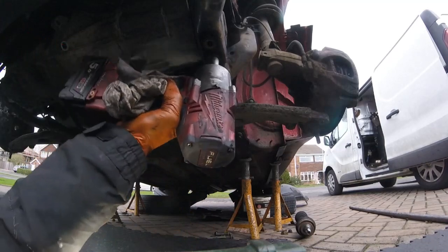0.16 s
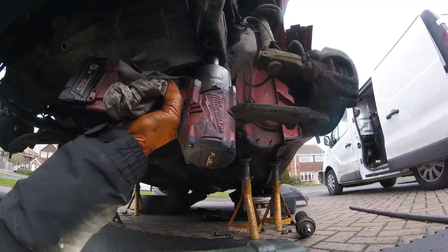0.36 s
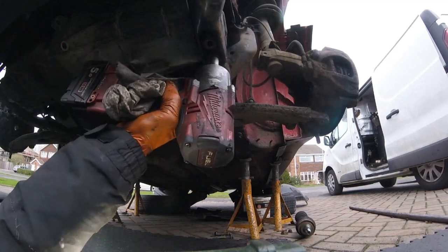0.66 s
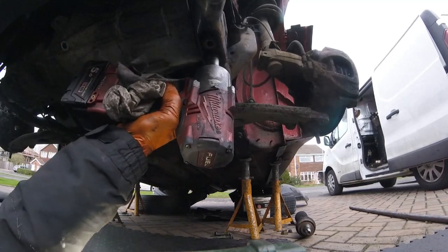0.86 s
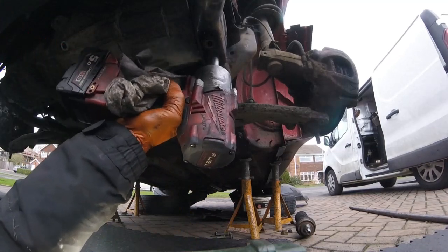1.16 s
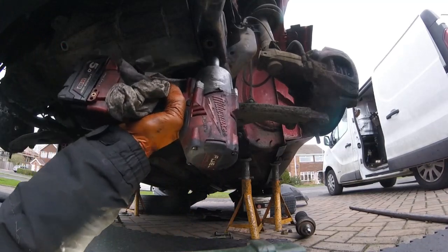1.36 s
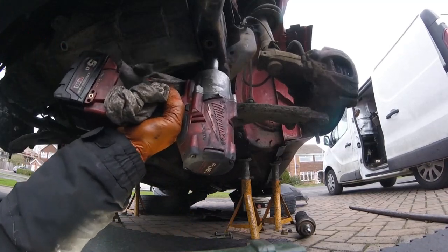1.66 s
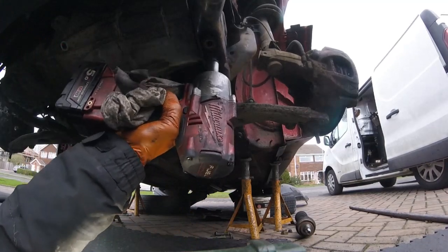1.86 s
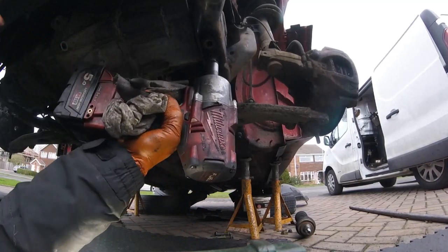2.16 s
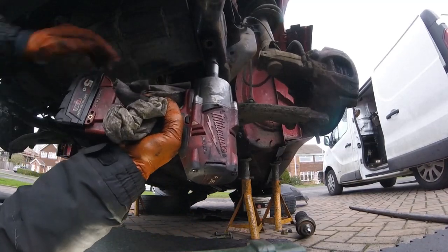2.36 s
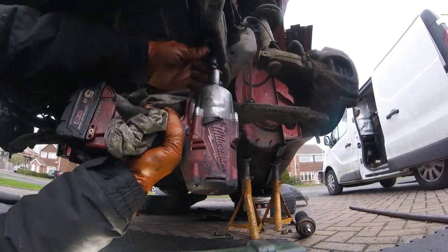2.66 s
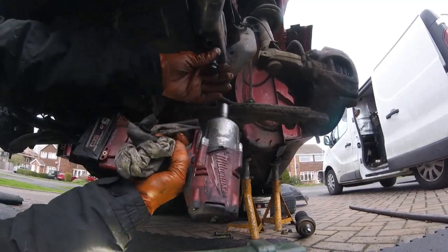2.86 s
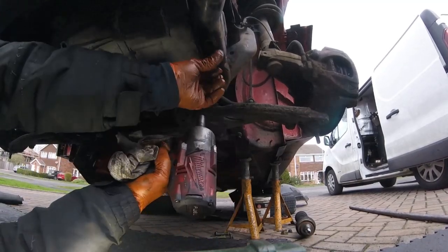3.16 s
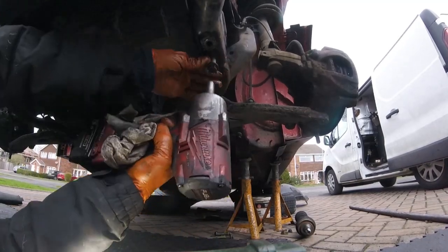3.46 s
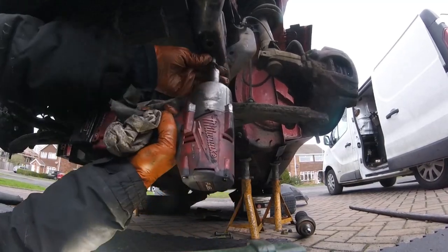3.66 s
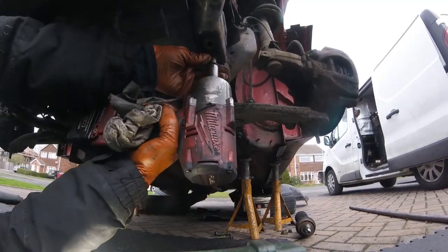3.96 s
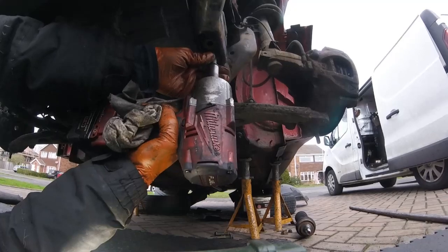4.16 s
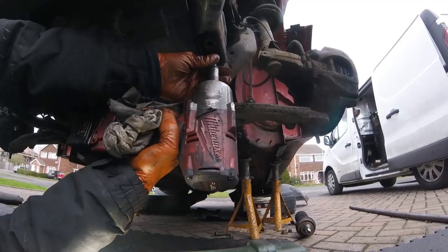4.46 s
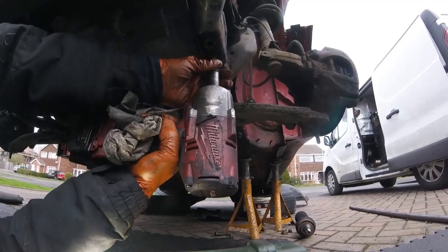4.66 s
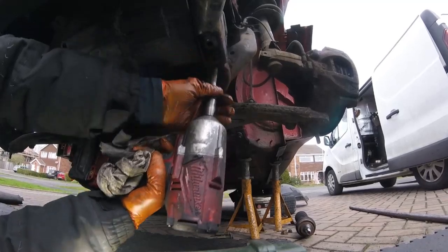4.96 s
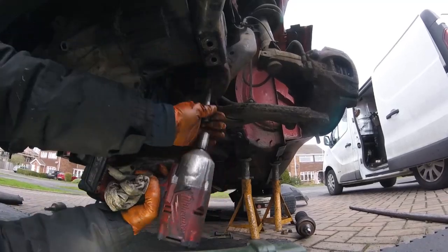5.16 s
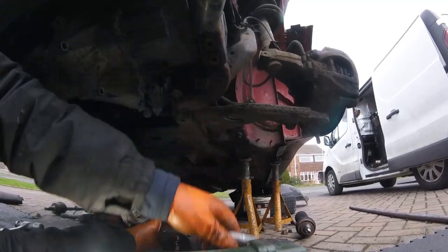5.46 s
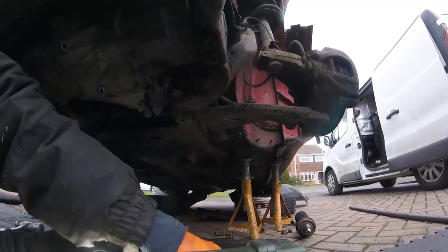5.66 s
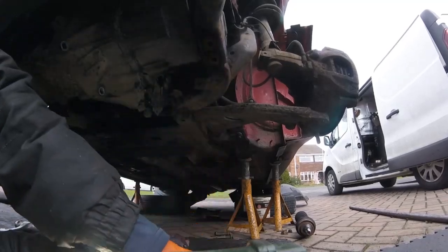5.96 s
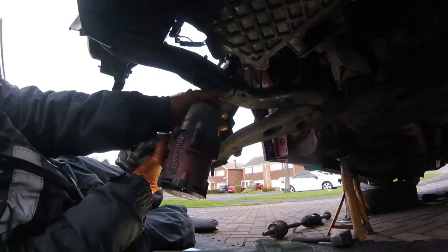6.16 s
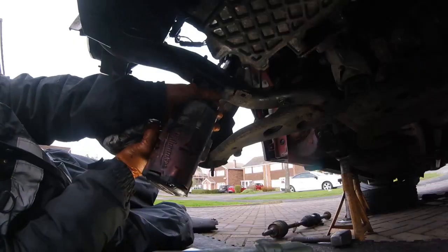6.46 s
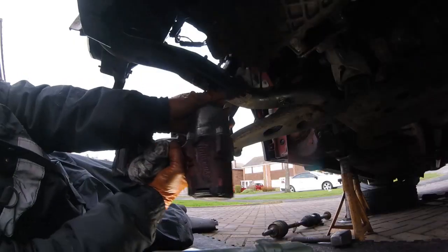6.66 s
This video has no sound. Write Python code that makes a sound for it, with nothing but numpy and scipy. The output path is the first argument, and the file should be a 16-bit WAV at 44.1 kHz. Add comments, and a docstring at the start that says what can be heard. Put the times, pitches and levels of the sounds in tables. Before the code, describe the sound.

Gusty wind buffets a muffled microphone while a cordless impact wrench rattles harshly on steel, stops, clicks, and later whirs freely without hammering.

```python
"""A cordless impact wrench under a car on a windy drive: a train of blows rings steel modes by modal synthesis.
Its motor is shaped gear noise plus sines: a chopper whine with sidebands, and orders of the turning field.
It hammers a bolt, brakes to a stop, spins free at part throttle, then after a short blip spins free again.
Parts click, squeaks and rustle lie over gusty wind: modulated rumble and flutter with separate pressure pops.
A closed housing dulls the sound at the microphone, and everything falls silent briefly near 6.2 s."""
import sys
import numpy as np
from scipy import signal
from scipy.fft import rfft, irfft, next_fast_len
from scipy.io import wavfile
from scipy.ndimage import uniform_filter1d

SR = 44100
rng = np.random.default_rng(int(sys.argv[2]) if len(sys.argv) > 2 else 0)


def master(y):
    """Save y as 16-bit WAV."""
    cut = np.clip(np.atleast_2d(y).T, -1, 1)
    pcm = np.round(cut * 32767)  # scale
    wavfile.write(sys.argv[1], SR, pcm.astype(np.int16))


N = 300188


def amp(db):
    """Level law: decibels to amplitude gain."""
    return 10 ** (np.asarray(db) / 20)


def evened(x):
    """Normalization: scales a signal to unit rms."""
    return x / np.sqrt(np.mean(x ** 2) + 1e-20)


def colour(x, points):
    """Linear filtering: multiplies the spectrum by a (f/Hz, gain/dB) curve."""
    f, db = np.transpose(points)
    size = next_fast_len(len(x))
    hz = np.fft.rfftfreq(size, 1 / SR)
    gain = amp(np.interp(np.log(hz + 1), np.log(f + 1), db))
    return irfft(rfft(x, size) * gain, size)[:len(x)]


def noise(points, count=N):
    """Stationary random noise of unit rms with a given spectral density."""
    return evened(colour(rng.standard_normal(count), points))


def drift(hz, count=N):
    """Slow random modulation: unit noise with little power above hz."""
    return noise([(hz / 20, 0), (hz, 0), (2 * hz, -40)], count=count)


def add(mix, s, sound):
    """Superposition: adds a sound to the mix at time s."""
    part = mix[max(round(s * SR), 0):][:len(sound)]
    part += sound[:len(part)]


def spread(rows):
    """Linear interpolation: start time and per-sample columns of a time table."""
    s, *columns = np.transpose(rows)
    times = np.arange(s[0], s[-1], 1 / SR)
    return s[0], [np.interp(times, s, c) for c in columns]


def level(tables):
    """Amplitude envelope of (t/s, level/dB) tables, silent outside them."""
    gain = np.zeros(N)
    for rows in tables:
        s, (db,) = spread(rows)
        add(gain, s, amp(db))
    return uniform_filter1d(gain, int(0.0027 * SR))  # edges smoothed over 2.7 ms


def tone(hz, waver_db):
    """Frequency modulation: a sine of integrated pitch whose strength wavers at random."""
    phase = 2 * np.pi * (np.cumsum(hz) / SR + rng.random())
    return np.sqrt(2) * amp(waver_db * drift(27, count=len(hz))) * np.sin(phase)


# Ringing modes of the struck anvil [f/Hz, nominal level/dB, nominal t60/s]
ANVIL_MODES = [(608, -15.5, 0.11), (735, -14, 0.092), (805, -10.5, 0.065), (961, -10.5, .09),
               (1181, -8, 0.075), (1557, -6.5, 0.069), (1930, -16.5, 0.11), (2150, -13, 0.089),
               (2822, -11.5, 0.069), (3580, -12, .06), (3870, -9, 0.05), (4350, -17, .06),
               (4900, -8, 0.044), (5110, 1.5, 0.027), (5380, -2.5, 0.047), (5680, -2.5, 0.05),
               (6440, -5.5, .04), (6460, -2, 0.042), (6590, -4, 0.055), (7100, -6, 0.036),
               (7600, -5.5, 0.029)]
# Noise spectrum of metal contact, also used by chatter [f/Hz, relative density/dB]
CRASH_SPECTRUM = [(240, -51.5), (400, -25), (510, -32), (584, -9.5), (649, -10), (791, -12.5), (1070, -3),
                  (1520, -2), (1710, -4), (2210, 0.5), (4120, -2.5), (5170, 2.5), (7320, -8), (9050, -9.5),
                  (14900, -44)]
CONTACT_S, SNAP_T60_S = .00025, .011  # linear rise at contact; decay of the bright snap


def strike(low_db, top_db, bolt_db, t60, bounce_s, bounce_db, ring_db, tail_db, share=1):
    """Impact excitation: snap, noise crash, rebound, decaying modes and a tail off the underbody."""
    t = np.arange(int(.15 * SR)) / SR - .005  # starts 5 ms before contact
    late = t - bounce_s
    shape = amp(-60 * t / t60)
    shape = shape + amp(bounce_db - 60 * late / t60) * (late > 0)
    shape = shape + amp(tail_db - 60 * t / 0.095)
    snap = noise([(4000, -28.0), (6500, 6.0), (8000, -2.5), (10000, -6.5), (12000, -20.5),
                  (15000, -33.5)], count=len(t))
    crash = noise(CRASH_SPECTRUM, count=len(t)) * shape
    crash = crash + amp(top_db + 3.5 - 60 * t / SNAP_T60_S) * snap
    ring = np.zeros(len(t))
    for hz, db, long in ANVIL_MODES:
        louder, sharper, phase = rng.standard_normal(3)  # each strike excites the modes differently
        decay = amp(db + 4.2 * louder - 60 * t / (long * share))
        ring += decay * np.sin(2 * np.pi * hz * (1 + 0.008 * sharper) * t + np.pi * phase)
    # the rebound rings too
    ring = ring + amp(bounce_db) * np.roll(ring, round(bounce_s * SR)) * (late > 0)
    tilt = [(300, low_db), (2300, low_db), (4400, 0.003), (5900, 0.00064), (6450, bolt_db),
            (6950, 0.00062), (7400, 2.8 * top_db)]
    hit = colour((crash + amp(ring_db) * ring) * np.clip(t / CONTACT_S, 0, 1), tilt)
    return hit / np.sqrt(np.mean(hit[(t > 0) & (t < .005)] ** 2))  # unit rms over the first 5 ms


# Hammer on anvil; level is taken over the first 5 ms
# [t/s, level/dB, low knock gain/dB, bolt ring gain/dB, rebound delay/ms, rebound level/dB, t60/s]
HAMMER_BLOWS = [(0.988, -13, -4, 1.5, 5.8, -2.5, 0.033), (1.058, -16, 0, -1, 5.7, -6.5, 0.033),
                (1.0943, -14, 0.5, 0, 4, -1, 0.044), (1.1202, -11.5, 0, 5.5, 2.9, -3.5, 0.049),
                (1.1483, -11.5, 1, 6.5, 2.15, -5.5, 0.029), (1.175, -13.5, 0, 4, 3.6, -7, 0.047),
                (1.2002, -17.5, -14, 9, 3.6, 0.5, 0.11), (1.2288, -14, -3.5, -1, 2.5, -10, 0.036),
                (1.2562, -15, -0.5, -2.5, 3.7, -4, .045), (1.286, -16.5, 1.5, -1, 4.5, -5, 0.047),
                (1.314, -16, 2, -7, 2.9, -3, 0.047), (1.345, -16, 1.5, 1, 3.1, -7.5, 0.045),
                (1.378, -16, 1.5, -6, 4.2, -19, 0.035), (1.42, -15, 2, 4.5, 4.2, -16, 0.021),
                (1.4611, -14, 3, 5.5, 6, -13.5, 0.037), (1.505, -13.5, -0.5, 3, 3.8, -5, 0.039),
                (1.5467, -14, 0, 1, 1.8, -10.5, 0.052), (1.5908, -15, -5.5, 0.5, 5.8, -18, 0.077),
                (1.635, -16.5, -3.5, -4, 5.9, -7, 0.047), (1.677, -19, -4, -2, 3.5, -13, 0.053),
                (1.7202, -17, -3.5, -5, 3, -16, 0.063), (1.7636, -16.5, -3.5, -13, 3.05, -10.5, 0.035)]
BLOW_TOP_DB, UNEVEN_TOP_DB = 2.0, .7  # mean and random spread of the top-end weight


def hammer():
    """Repeated impact: the hammer drives the anvil and bolt in a train of blows."""
    out = np.zeros(N)
    for s, db, low_db, bolt_db, ms, bounce_db, t60 in HAMMER_BLOWS:
        top_db = BLOW_TOP_DB + UNEVEN_TOP_DB * rng.standard_normal()
        blow = strike(low_db, top_db, bolt_db, t60, ms / 1e3, bounce_db, ring_db=-4.0, tail_db=-24.0)
        add(out, s - .005, amp(db) * blow)
    return out


# Trigger, socket and slack in the drive; level is taken over the first 5 ms
# [t/s, level/dB, low knock gain/dB, top-end weight/dB]
DRIVE_CLICKS = [(0.157, -46.5, 6, 1.5), (0.414, -46.5, 0, -27), (.852, -51, 21, -20),
                (0.8666, -34, 17.5, -30), (0.935, -24.5, 3.5, -3), (0.976, -36, 1.5, 3),
                (1.0347, -36, 17, -0.5), (1.0845, -20, -1.5, -0.5), (1.784, -28, -9, -2),
                (1.814, -37, -22, 0), (1.832, -33, -23, -2), (1.9607, -35, -3, -2), (2.1065, -29, -8, -2.5),
                (2.164, -37.5, 3, -0.5), (2.258, -34, 9, -1), (2.865, -33.5, 8, -10),
                (2.8879, -25, -1.5, -2), (2.945, -25, -0.5, -3.5), (3.3253, -57, 20, -15),
                (3.441, -46, -15, -2.5), (3.473, -46, -21, -1.5), (3.6453, -39, 8, -14),
                (3.6687, -32, 16, -13), (3.7546, -43.5, 7, 0), (3.824, -47, 7, -15),
                (3.9098, -42.5, 19, -10.5), (3.9781, -22.5, -10.5, -4), (4.042, -44, 11, 15),
                (4.055, -16.5, 1.5, 2), (4.9693, -20.5, -1.5, -9.5), (5.034, -34.5, 1, -3),
                (5.107, -50, 24, -15), (5.1542, -60, 16, -14), (5.251, -46, 6, -5),
                (5.657, -42.5, 25, -20.5), (5.7904, -39.5, 28, -6), (5.8757, -34.5, 24, -16),
                (6.0294, -49, 6, -11), (6.36, -47.5, 13.5, -25)]


def clicks():
    """Light impact: small parts excite the same modes, which die twice as fast as under the hammer."""
    out = np.zeros(N)
    for s, db, low_db, top_db in DRIVE_CLICKS:
        click = strike(low_db, top_db, bolt_db=-7.0, t60=.016, bounce_s=0.0026, bounce_db=-26.5,
                       ring_db=-10.5, tail_db=-11.0, share=.5)
        add(out, s - .005, amp(db) * click)
    return out


# Gear noise of each trigger pull, also driving chatter [t/s, level/dB]
GEAR_LEVELS = [
    [(.925, -38.5), (.979, -29.5), (1.012, -29.5), (1.02, -39), (1.17, -26), (1.35, -34.5), (1.79, -35.5),
     (1.93, -37.5), (2.04, -44), (2.065, -53)],
    [(2.11, -36.5), (2.14, -41), (2.2, -45.5), (2.5, -44.5), (2.75, -42), (2.87, -40.5), (2.93, -58)],
    [(3.964, -42), (4.04, -38), (4.1, -36.5), (4.4, -33), (4.85, -31), (4.97, -26), (5.0, -41),
     (5.05, -44.5)],
]
# Gear noise spectrum [f/Hz, relative density/dB]
GEAR_SPECTRUM = [(240, -32), (400, -2.5), (554, -3), (863, 2.5), (1280, -2.5), (1530, 1), (1790, -1),
                 (2120, 0), (3760, -5), (5560, 1.5), (7310, -7.5), (8000, -8.5), (9000, -13.5),
                 (11700, -48.5), (19800, -120)]
# Fan hiss spectrum [f/Hz, relative density/dB]
FAN_SPECTRUM = [(7000, -33.5), (8500, -14), (10000, 4), (11800, -9), (13000, -13), (14500, -32.5)]
# Fan hiss relative to the gears, one value a pull [level/dB]
FAN_LEVELS = -24, -20, -17
# The housing sings as the motor bites [t/s, level/dB]
SING_LEVELS = [(3.982, -46), (4.04, -50), (4.08, -49), (4.125, -43), (4.16, -56)]
SING_HZ = 2940


def gear_noise():
    """Broadband machine noise: gears and fan under random modulation, with a narrow singing band."""
    fan = sum(amp(db) * level([rows]) for rows, db in zip(GEAR_LEVELS, FAN_LEVELS))
    whir = level(GEAR_LEVELS) * noise(GEAR_SPECTRUM) + fan * noise(FAN_SPECTRUM)
    roughness = evened(amp(1.8 * drift(36) + 2.0 * drift(330)))
    band = [(SING_HZ - 150, -30), (SING_HZ - 30, 0), (SING_HZ + 30, 0), (SING_HZ + 150, -30)]
    return whir * roughness + level([SING_LEVELS]) * noise(band)


# Part throttle: the first whine under the chopper follows the rotor [t/s, whine f/Hz, reference level/dB]
SPIN_CURVES = [
    [(2.16, 7370, -57), (2.22, 7340, -53), (2.27, 7323, -52), (2.38, 7305, -51), (2.45, 7298, -49),
     (2.55, 7293, -49), (2.65, 7289, -49), (2.76, 7285, -47), (2.81, 7264, -45), (2.86, 7240, -46)],
    [(4.075, 7420, -44), (4.11, 7365, -39), (4.14, 7350, -38), (4.2, 7320, -38), (4.29, 7286, -39.5),
     (4.41, 7251, -39), (4.53, 7224, -38), (4.65, 7207, -38.5), (4.8, 7194, -38), (4.94, 7184, -38)],
]
# A short blip just before the second spin [t/s, whine f/Hz, reference level/dB]
BLIP_CURVE = [(3.99, 7600, -50), (4.02, 7490, -48), (4.05, 7455, -47)]
# Sideband offsets from the chopper [multiple of the field frequency]
SIDEBAND_ORDERS = -5, -4, -3, -2, -1, 0, 1, 2, 3, 4
# Sideband strengths at a field of 532.5 Hz [level relative to the reference/dB]
SIDEBAND_LEVELS = -3, -1, -13, -4.5, 0.5, -8, -9, -16.5, -19, -16
# Rotor orders while spinning [multiple of the field frequency]
ROTOR_ORDERS = 2, 2.25, 3, 3.25, 3.44, 4, 4.62, 5, 5.5, 5.7, 6, 6.5, 7, 7.84, 8, 10, 12
# Strength of each order
# [level relative to the reference at 500 Hz field/dB, growth/dB per 100 Hz, extra on a light pull/dB]
ROTOR_ORDER_LEVELS = [(-14, 0, 0), (-24, 0, 12), (-5, 6, -4), (-4, 1, -1), (-16, 0, -3), (-15, 3, 0),
                      (-19, 0, 9), (-13, 5, 0), (-10, 9, -5), (-20, 0, 12), (-13, 1, 8), (-14, 4, -3),
                      (-17, -3, 6), (-24, 0, 10), (-18, -2, 11), (-21, 0, 6), (-23, 0, 11)]
CHOPPER_HZ = 7732
FAR_SIDE_DB_PER_HZ = .022  # growth with speed for each step beyond the first sideband, up to three
SPIN_EDGE_S = 0.0098  # linear fade at switching on and off
FULL_PULL_DB, LIGHT_PULL_DB = -43.5, -48  # reference levels of a firm and of a light pull
HUNTING = .001  # rms tremble of the rotor orders, as a share of speed


def spinning():
    """Modulation sidebands: the field flanks the chopper tone; rotor orders are multiples of the field."""
    whine, orders = np.zeros((2, N))
    for rows in list(SPIN_CURVES) + [BLIP_CURVE]:
        s, (whine_hz, db) = spread(rows)
        t = np.arange(len(db)) / SR
        field = CHOPPER_HZ - uniform_filter1d(whine_hz, size=1500, mode="nearest")
        gain = amp(db) * np.clip(np.minimum(t, t[::-1]) / SPIN_EDGE_S, 0, 1)
        for k, side_db in zip(SIDEBAND_ORDERS, SIDEBAND_LEVELS):
            steps = min(max(abs(k) - 1, 0), 3)
            speed_db = steps * FAR_SIDE_DB_PER_HZ * (field - 532.5)
            sideband = tone(CHOPPER_HZ + k * field, waver_db=0.34 * abs(k))
            add(whine, s, gain * amp(side_db + speed_db) * sideband)
        light = np.interp(db, [LIGHT_PULL_DB, FULL_PULL_DB], [1, 0])
        gain = gain * amp(.1 * np.minimum(field - 340, 0))  # faint until the rotor is up to speed
        field = field * (1 + HUNTING * drift(40, count=len(db)))
        for k, (order_db, growth, light_db) in zip(ROTOR_ORDERS, ROTOR_ORDER_LEVELS):
            strength = amp(order_db + growth * (field - 500) / 100 + light_db * light)
            add(orders, s, gain * strength * tone(k * field, waver_db=2.0))
    return whine, orders


# Braking to a stop [t/s, field f/Hz, reference level/dB]
BRAKE_CURVE = [(1.83, 672, -52), (1.87, 680, -48), (1.895, 682, -47), (1.915, 650, -44), (1.945, 576, -48),
               (1.98, 478, -46), (2.015, 375, -48), (2.03, 322, -49), (2.06, 200, -51)]
# Whines under braking [multiple of the field frequency]
BRAKE_ORDERS = 2, 3.67, 4.25, 6, 6.4, 7.4, 8.3, 9.25, 12, 14.6
# Strength of each order at 650 Hz field [level relative to the reference/dB]
BRAKE_ORDER_LEVELS = 3, 3, -5, 0, -2, -1, -2, -1, 1.5, -5
# Change with field frequency; positive slopes fade as it slows [slope/dB per Hz]
BRAKE_ORDER_FADES = -.01, .03, .03, -.005, .04, .03, .03, -.008, .012, .01
# Braking whines carry best in the middle [f/Hz, gain/dB]
BRAKE_RESPONSE = [(900, -9), (2200, -1), (6500, -2), (8500, -9)]


def braking():
    """Order tracking: whines tied to the slowing field glide down together; returns start and sound."""
    s, (field, db) = spread(BRAKE_CURVE)
    field = uniform_filter1d(field, size=500, mode="nearest")
    field = field * (1 + .0045 * drift(130, count=len(db)))  # the brake chatters
    whines = np.zeros(len(db))
    for k, order_db, fade in zip(BRAKE_ORDERS, BRAKE_ORDER_LEVELS, BRAKE_ORDER_FADES):
        whines += amp(db + order_db + fade * (field - 650)) * tone(k * field, waver_db=3.0)
    return s, colour(whines * signal.windows.tukey(len(db), .2), BRAKE_RESPONSE)


# Tool housing resonances [f/Hz, width/Hz, peak gain/dB for noise]
SHELL_RESONANCES = [(2975, 130, 3.5), (5240, 350, 2.5), (6500, 190, -1), (1620, 160, -0.5), (820, 190, 0)]
# The lowest whines carry poorly [f/Hz, gain/dB]
WHINE_RESPONSE = [(5000, -10), (5350, 0)]
TONE_BLOOM = 1.7  # rotor orders feel the resonances, in dB, this much more than the noise does


def motor():
    """Source and resonator: the tool housing colours the gears, the braking whines and the orders."""
    whine, orders = spinning()
    gears = gear_noise()
    add(gears, *braking())
    hz = np.arange(100, SR / 2, 10)
    shell_db = sum(db / (1 + (2 * (hz - f) / width) ** 2) for f, width, db in SHELL_RESONANCES)
    gears = colour(gears, np.transpose([hz, shell_db]))
    orders = colour(orders, np.transpose([hz, TONE_BLOOM * shell_db]))
    return colour(whine, WHINE_RESPONSE) + gears + orders


def chatter():
    """Random impact process: slack parts tick harder the harder the motor works."""
    size = amp(3.6 * np.minimum(rng.exponential(1, N), 4))
    size = size * (rng.random(N) < 70 / SR)  # about 70 ticks a second
    t = np.arange(400) / SR
    ticks = np.zeros(N)
    for k in range(3):  # three kinds of tick
        tick = noise(CRASH_SPECTRUM, count=400) * amp(-60 * t / 0.011)
        ticks += signal.oaconvolve(size * (np.arange(N) % 3 == k), tick)[:N]
    return amp(-30.5) * level(GEAR_LEVELS) * evened(ticks)


# Knocks on a hollow metal part
# [t/s, nominal level/dB, tuning factor, ring length factor, upper modes relative level/dB]
HOLLOW_KNOCKS = [(3.644, -26.5, 1.18, 0.81, -9), (3.667, -26.5, 1.05, .8, -4.5),
                 (5.251, -25, .96, 1.1, -1.5), (5.262, -29.5, 1.05, 0.77, 3)]
# Modes of that part before tuning [f/Hz, relative level/dB, nominal t60/s]
HOLLOW_MODES = [(774, -1, 0.1), (1540, -6, 0.059), (1970, -0.5, 0.066), (2810, -13.5, .04),
                (4050, -21, .03), (5130, -10, 0.03), (8280, -17, 0.034)]


def clink():
    """Modal decay: knocks leave a short hollow ring of damped sines."""
    out, t = np.zeros(N), np.arange(int(.2 * SR)) / SR
    for s, level_db, tuning, long, upper_db in HOLLOW_KNOCKS:
        ring = np.zeros(len(t))
        for k, (hz, db, t60) in enumerate(HOLLOW_MODES):
            decay = amp(db + upper_db * (k > 0) - 60 * t / (t60 * long))
            ring += decay * np.sin(2 * np.pi * hz * tuning * t)
        onset = np.minimum(t / 0.0017, 1)
        add(out, s, amp(level_db) * ring * onset * amp(2.2 * drift(170, count=len(t))))
    return out


# A faint wavering squeak [t/s, f/Hz, nominal level/dB]
SQUEAK_CURVES = [
    [(.385, 2750, -59), (.415, 2900, -52), (.44, 2640, -50), (.47, 2620, -50), (.5, 2750, -55.5),
     (.55, 2650, -58)],
    [(.62, 2600, -58), (.66, 2600, -60), (.685, 2900, -54), (.712, 2730, -47.5), (.77, 2450, -58),
     (.795, 2730, -52), (.83, 2850, -53), (.86, 2600, -56), (.9, 2550, -58), (.93, 2750, -47),
     (.975, 2900, -42.5)],
]


def squeak():
    """Line broadening: noise on a gliding carrier makes a faint breathy whistle."""
    out = np.zeros(N)
    for rows in SQUEAK_CURVES:
        s, (hz, db) = spread(rows)
        breath = noise([(1, 7.0), (200, 6.0), (600, -27.0)], count=len(hz))
        whistle = (0.4 + breath) * tone(hz, waver_db=0.5)
        add(out, s, amp(db - 1.5) * whistle * signal.windows.tukey(len(hz), .15))
    return out


# Outdoor hiss and rustle of sleeves [t/s, level/dB]
RUSTLE_LEVELS = [(0, -54), (.9, -56.5), (2.08, -60), (2.9, -51.5), (3.3, -61.5), (3.5, -51.5), (3.6, -54.5),
                 (3.95, -54.5), (5.2, -47), (5.35, -53), (5.5, -60), (5.9, -55.5), (6.0, -50.5),
                 (6.09, -54.5), (6.29, -74.5), (6.6, -66.5), (6.7, -56.5), (6.81, -60)]
# Their spectrum [f/Hz, relative density/dB]
RUSTLE_SPECTRUM = [(880, -3.5), (1500, -2.5), (2310, -6), (2880, -9.5), (3960, -12.5), (4400, -16),
                   (5280, -2), (6040, -8.5), (6590, -3.5), (7180, -14), (9400, -18), (10300, -19),
                   (12800, -32.5), (13700, -38.5), (14900, -61.5)]


def rustle():
    """Amplitude-modulated noise: fast grain and slower swings on hiss shaped by the housing."""
    swing = amp(0.73 * drift(60) + 2 * drift(8))
    return level([RUSTLE_LEVELS]) * evened(noise(RUSTLE_SPECTRUM) * swing)


# Wind flutter, and the torn edge of pops [f/Hz, relative density/dB]
FLUTTER_SPECTRUM = [(150, -12.5), (300, 1), (500, -7), (800, -10.5), (1500, -25), (2500, -43.5),
                    (4000, -63.5), (7000, -120)]


def pop(db, hz, edge_db):
    """Pressure transient: one eddy swings once or twice with a torn edge; starts three cycles early."""
    u = np.arange(-3, 3, hz / SR)  # time in cycles
    swing = np.exp(-abs(u / 0.64) ** 1.8) * np.cos(2 * np.pi * u) * rng.choice([-1, 1])
    edge = noise(FLUTTER_SPECTRUM, count=len(u)) * np.exp(-(u / 0.96) ** 2)
    return amp(db) * (swing + amp(edge_db) * edge)


# Mean strength of the wind on the microphone [t/s, rumble level/dB]
WIND_LEVELS = [(0, -29), (.3, -22.5), (.75, -30), (.87, -28), (.97, -22), (1.03, -36), (1.2, -35),
               (1.55, -49.5), (1.81, -36.5), (2.12, -34.5), (2.6, -21), (2.75, -26.5), (2.96, -25.5),
               (3.05, -27), (3.97, -31), (4.14, -37.5), (4.54, -41.5), (4.62, -28), (4.93, -28.5),
               (5.85, -24.5), (6.05, -32.5), (6.1, -47.5), (6.29, -44.5), (6.47, -31), (6.74, -38),
               (6.81, -19.5)]
# Wind rumble spectrum [f/Hz, relative density/dB]
RUMBLE_SPECTRUM = [(8.8, -46.5), (15, -18.5), (48, 2.5), (115, -0.5), (258, -11.5), (500, -25.5),
                   (650, -32.5), (1100, -120)]
# Single eddies bursting on the port [t/s, swing peak level/dB, f/Hz, sharp edge relative level/dB]
EDDY_POPS = [(0.0917, -9.5, 168.4, -16.5), (0.178, -9.5, 239, -22), (0.3368, -24, 202, -28),
             (0.362, -8.5, 275, -10), (0.412, -16.5, 225, -40), (0.499, -38, 204, -18),
             (0.5254, -13.5, 278, -23), (0.5455, -13.5, 151.2, -14), (0.6867, -21, 159, -22),
             (0.852, -29, 293, 4), (0.8688, -16.5, 365, 7), (0.881, -20, 306, -1.5),
             (0.896, -7.5, 170, -11), (0.932, -19, 164.7, -7), (0.9617, -11.5, 232, -28),
             (2.243, -23.5, 203, -4), (2.3276, -14, 116.4, -11), (2.416, -14, 192.7, -11.5),
             (2.56, -35, 199, -32), (2.621, -13, 221, -34), (2.804, -19, 180, -7), (2.901, -19, 164.3, -7),
             (2.945, -14.5, 221, -5.5), (2.961, -13.5, 194, -12), (3.1903, -28, 147, -28),
             (3.2191, -32, 139, -3), (3.3375, -9, 157, -17.5), (3.578, -23, 299, -6),
             (3.5938, -18.5, 226, -19), (3.6475, -16, 159, -10), (3.6674, -18, 493, -4.5),
             (3.8153, -21, 94, -35), (3.931, -25, 148.6, -8), (3.966, -22.5, 477, -3),
             (3.968, -11.5, 152, -23), (4.603, -11.5, 224, -24), (4.76, -15.5, 250, -6),
             (4.803, -15.5, 159.7, -4.5), (4.8693, -13, 354, -10), (4.949, -4.5, 246, -11.5),
             (4.9965, -12.5, 192, -8), (5.037, -9.5, 203, -15), (5.065, -10.5, 149.3, -18),
             (5.1017, -12.5, 147, -9), (5.1387, -8, 202, -27), (5.155, -22.5, 248, -1),
             (5.227, -10, 197, -11.5), (5.256, -17, 161, -27), (5.2791, -14, 231, -17),
             (5.297, -10, 301, -7), (5.391, -20, 247, -7.5), (5.413, -20.5, 116.6, -15),
             (5.4382, -8, 430, -13), (5.4874, -10.5, 170, -15), (5.5153, -14, 290, -8.5),
             (5.578, -23.5, 220.6, -3.5), (5.595, -30, 134, -42), (5.615, -29, 261, -8),
             (5.6338, -6, 278.4, -16), (5.687, -24, 300, -2), (5.706, -14.5, 256, -8), (5.723, -29, 330, 4),
             (5.739, -13, 263, -8.5), (5.753, -16.5, 250, -12), (5.7793, -15.5, 301, -0.5),
             (5.824, -9.5, 153, -16.5), (5.86, -26.5, 261, 2), (5.885, -11.5, 285.4, -6),
             (5.9175, -13, 123, -10), (5.974, -14, 171, -27), (6.021, -30, 330, -3),
             (6.4978, -29, 151.2, -10), (6.52, -19.5, 195.6, -15.5), (6.582, -23, 237, -7.5),
             (6.607, -18, 323, -28), (6.7854, -33, 252, -20.5)]
FLUTTER_DB = -17.5  # flutter relative to the rumble
SWELL_DB, SWELL_S = -11.5, 0.024  # rumble swell with each pop: level under its peak, 1/e half width
SMALL_POPS_PER_S, SMALL_POP_DB = 15, 9.5  # lesser pops: rate, highest peak over the mean wind
SMALL_POP_LOW_HZ, SMALL_POP_HIGH_HZ = 130, 300


def wind():
    """Turbulent pressure: lumpy rumble whose strongest lumps tear into flutter; single eddies pop."""
    lumps = drift(60)
    rumble = evened(noise(RUMBLE_SPECTRUM) * amp(0.14 * lumps))
    flutter = evened(noise(FLUTTER_SPECTRUM) * amp(0.86 * lumps + 2.88 * drift(70)))
    mean = level([WIND_LEVELS])
    gain = mean.copy()
    t = np.arange(-.1, .1, 1 / SR)
    for s, db, _, _ in EDDY_POPS:
        add(gain, s + t[0], amp(db + SWELL_DB) * np.exp(-(t / SWELL_S) ** 2))
    out = gain * (rumble + amp(FLUTTER_DB) * flutter)
    for s, db, hz, edge_db in EDDY_POPS:
        add(out, s - 3 / hz, pop(db, hz, edge_db))
    for when, pitch, weakness in rng.random((int(SMALL_POPS_PER_S * N / SR), 3)):
        hz = np.interp(pitch, [0, 1], [SMALL_POP_LOW_HZ, SMALL_POP_HIGH_HZ])
        small = pop(SMALL_POP_DB - 9.6 * weakness, hz, edge_db=-8.0)
        add(out, when * N / SR, mean[int(when * N)] * small)
    return out


def scene():
    """Superposition of all sources at one microphone."""
    tool = hammer() + clicks() + motor() + chatter()
    return (tool + clink() + squeak() + rustle() + wind())[None]


# The closed housing dulls the top end [f/Hz, gain/dB]
PORT_RESPONSE = [(9000, -0.5), (11000, -9.5), (12000, -11), (15000, -20.5)]
OVERLOAD = .95  # amplitude at which the soft overload saturates
SILENCE_START_S, SILENCE_END_S = 6.087, 6.293
EDGE_HZ = 15000  # upper band limit


def record(dry):
    """Transmission chain: housing response, soft saturation, the brief silence, then the band limit."""
    t = np.arange(N) / SR
    heard = uniform_filter1d(1. * ((t < SILENCE_START_S) | (t > SILENCE_END_S)), size=60)
    loud = OVERLOAD * np.tanh(colour(dry[0], PORT_RESPONSE) / OVERLOAD)[None]
    lowpass = signal.firwin(511, EDGE_HZ, window=("kaiser", 9), fs=SR)[None]
    return signal.oaconvolve(loud * heard, lowpass, "same")


dry = scene()
out = record(dry)
master(out)
```